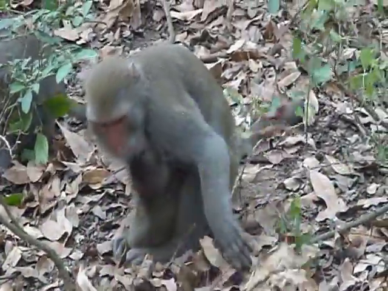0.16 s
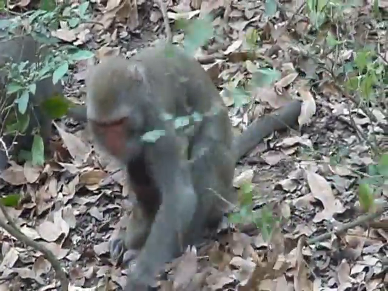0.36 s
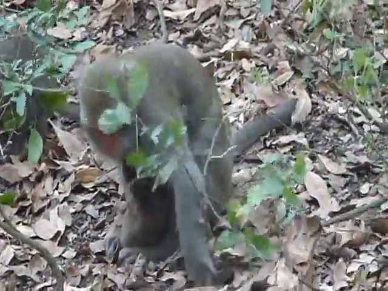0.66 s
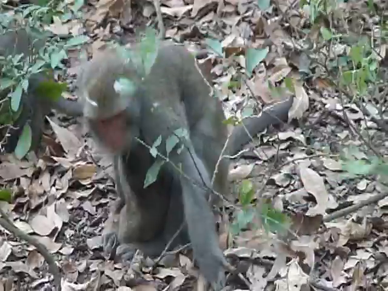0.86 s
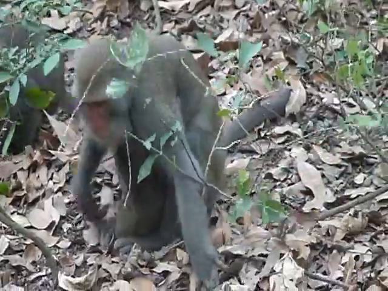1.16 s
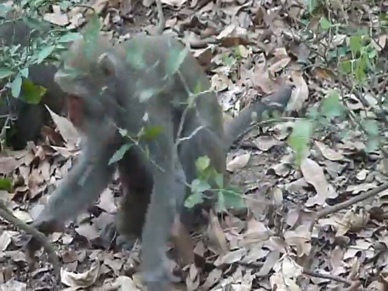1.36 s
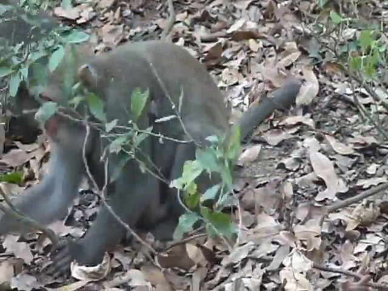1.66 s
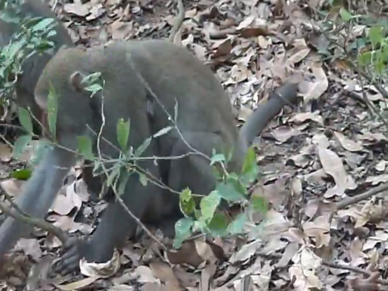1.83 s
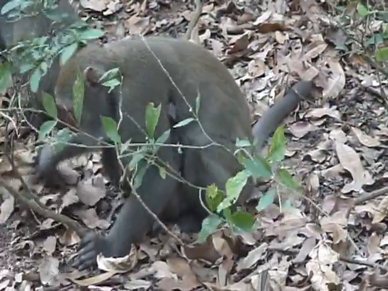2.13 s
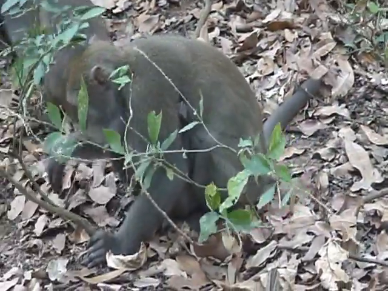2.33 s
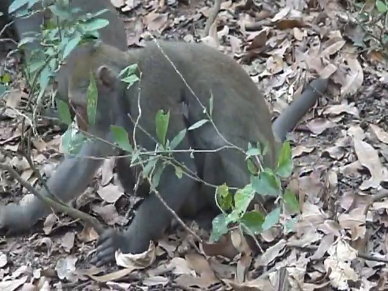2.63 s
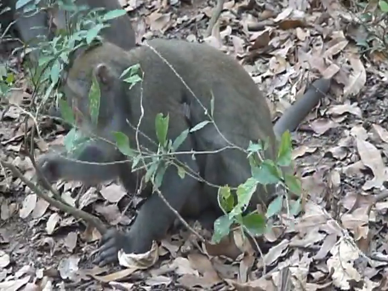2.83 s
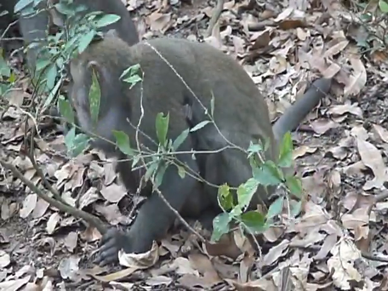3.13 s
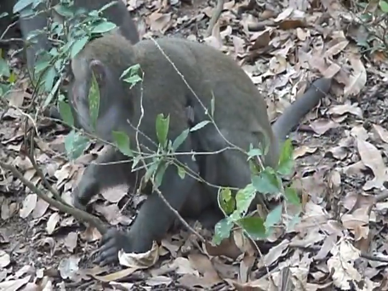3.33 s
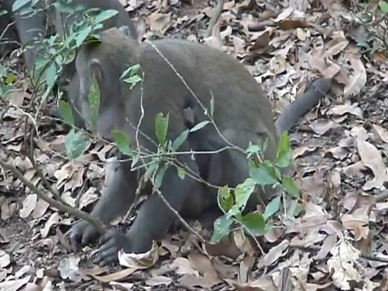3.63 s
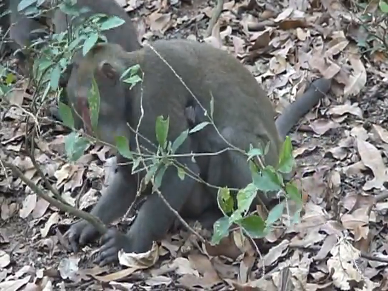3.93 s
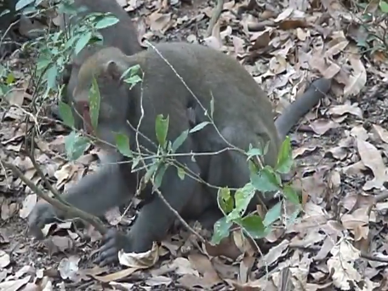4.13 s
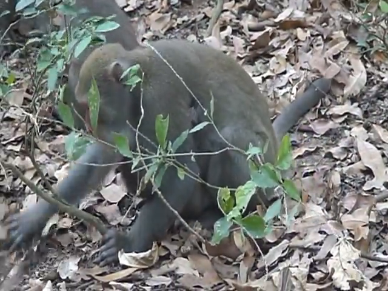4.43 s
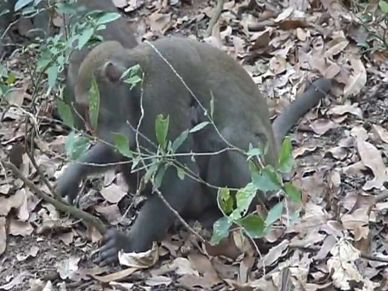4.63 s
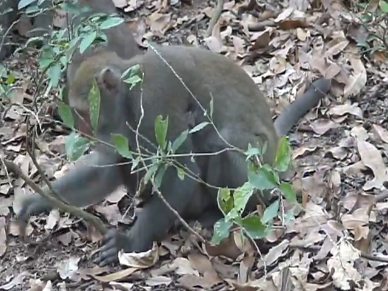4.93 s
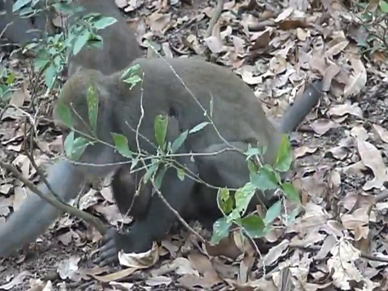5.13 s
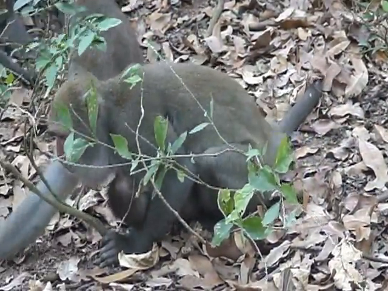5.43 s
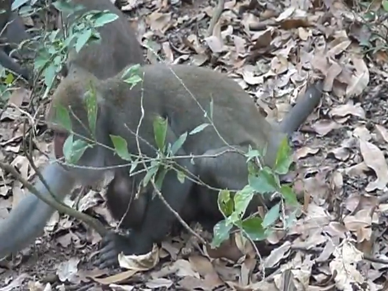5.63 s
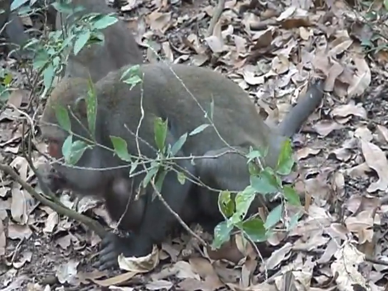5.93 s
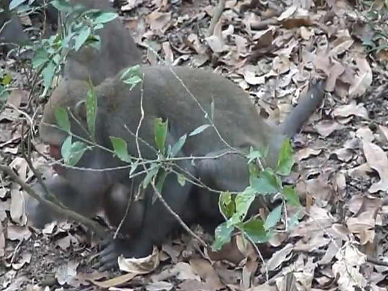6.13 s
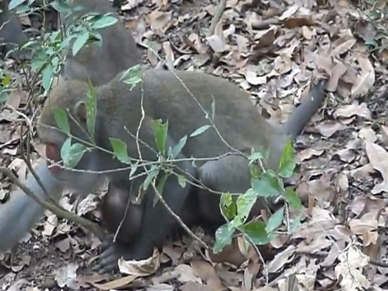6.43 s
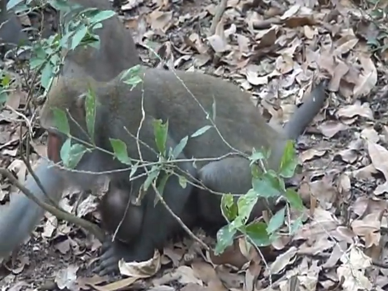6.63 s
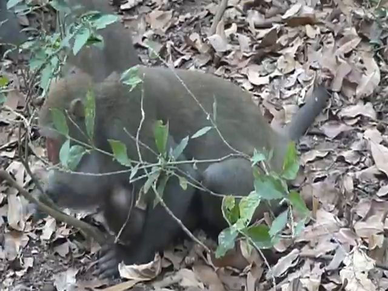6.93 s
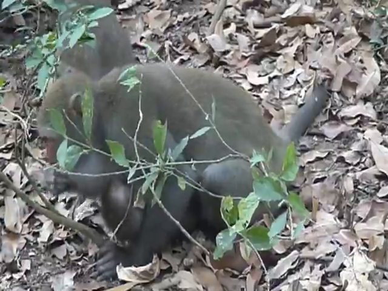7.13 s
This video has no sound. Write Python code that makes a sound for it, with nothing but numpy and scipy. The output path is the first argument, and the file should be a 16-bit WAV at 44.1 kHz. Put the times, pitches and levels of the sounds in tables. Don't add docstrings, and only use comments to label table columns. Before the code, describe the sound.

Dry leaves crackle under foraging hands as piercing monkey shrieks erupt twice, with low grunts between them, in an echoing forest over faint motor hum.

```python
import sys
import numpy as np
from scipy import signal
from scipy.fft import next_fast_len
from scipy.io import wavfile

SR = 44100
rng = np.random.default_rng(int(sys.argv[2]) if len(sys.argv) > 2 else 0)


def generate_wav(signal):
    frames = np.transpose(np.atleast_2d(signal))
    scaled = np.clip(frames, -1, 1) * 32767
    pcm = np.round(scaled).astype(np.int16)
    wavfile.write(sys.argv[1], SR, pcm)


def linear_from_db(decibels):
    return 10 ** (np.asarray(decibels, float) / 20)


N = 320607

# time in seconds, pitch in Hz, level in dB, roughness 0-1.
SCREECHES = [
    [(2.69, 1950, -35, .8), (2.72, 1991, -27.5, 0.9), (2.738, 2038, -22, 1.14), (2.77, 2323, -23.5, 0.85),
     (2.808, 2450, -32.5, 0.5)],
    [(2.724, 1446, -30, 0.7), (2.742, 1540, -28.5, 0.74), (2.76, 1750, -40, 1)],
    [(2.775, 4450, -26, 0.7), (2.795, 4430, -26, .7), (2.81, 4244, -22, 0.9), (2.84, 4500, -21.5, 1),
     (2.87, 4410, -17.5, 0.9), (2.887, 4100, -15.5, 1.2), (2.905, 3720, -41, 1)],
    [(2.848, 3150, -24.5, 0.3), (2.888, 3260, -20, 0.9), (2.918, 3050, -23, 0.9)],
    [(2.88, 2800, -23, 1.1), (2.9, 2600, -23.5, 1), (2.92, 2296, -34, 1)],
    [(3.0, 1040, -34, 1.1), (3.03, 1250, -30, 0.6), (3.051, 1494, -21.5, 0.6)],
    [(3.2, 1456, -21.5, 0.73), (3.212, 1890, -18.5, 0.94), (3.225, 2377, -15, 1.1),
     (3.245, 2600, -13, 0.82), (3.28, 2770, -18.5, 1.03), (3.315, 2420, -28.5, 0.7)],
    [(3.425, 1950, -23.5, 0.64), (3.45, 2206, -19, 1), (3.48, 2460, -19, 1.2), (3.515, 2410, -28, 0.9)],
    [(3.626, 2350, -20, 0.5), (3.645, 2426, -21, 0.63), (3.67, 2400, -31, .6)],
    [(6.918, 850, -33.5, .85), (6.94, 1080, -27, .8), (6.958, 1406, -27, .8), (6.975, 1653, -30, .9)],
    [(6.952, 1892, -23.5, .3), (6.965, 2148, -24.5, 0.3), (6.985, 2394, -28, 0.3), (7.0, 3080, -31, 0.3),
     (7.016, 3420, -29, 0.3)],
]
SCREECH_BRIGHT_DB = [2, 1, -4, -4.5, 3, 10, -5, 13.5, 6, 11, 3]
# time in seconds, pitch in Hz, level in dB, roughness 0-1.
ARCHES = [
    [(2.449, 3697, -24.5, 1), (2.48, 3900, -22.5, 0.5), (2.51, 4170, -27, 0.4), (2.54, 4340, -31, 1),
     (2.57, 4490, -25.5, 0.9), (2.6, 4490, -32, 0.8), (2.64, 4360, -40, 1)],
    [(2.412, 5600, -33, .2), (2.42, 5800, -30.5, 0), (2.428, 5640, -37, .5), (2.44, 5700, -37, .6)],
    [(6.209, 3070, -30.5, 0), (6.245, 3930, -25, 0.15), (6.27, 4094, -24, 0.26), (6.3, 4950, -33.5, 0.15),
     (6.32, 4800, -35, 0.4), (6.332, 4480, -27.5, 0.1), (6.36, 4350, -25, 0.07), (6.374, 4430, -28, 0),
     (6.385, 4510, -17, 0)],
    [(6.53, 3640, -33, 0.2), (6.545, 3900, -32, 0.2), (6.565, 4520, -31, 0.3)],
    [(6.531, 1150, -31, 0.64), (6.542, 1900, -22.5, 0), (6.555, 2317, -18.5, 0.13), (6.572, 3050, -24, 0.2),
     (6.59, 3800, -25, 0), (6.61, 4476, -24, 0.03), (6.637, 4444, -25.5, 0), (6.652, 3900, -22, 0.04),
     (6.688, 3810, -20.5, 0)],
    [(6.975, 3710, -31, 0.72), (6.992, 4040, -29.5, 0.66), (7.04, 4125, -31, 0.97),
     (7.075, 4080, -31.5, 0.54), (7.088, 3760, -29, 0.16), (7.118, 3620, -28.5, 0.2),
     (7.13, 3250, -29, 0.3)],
]
ARCH_BRIGHT_DB = [7, 0, -2.5, -15, -0.5, 2]
# time in seconds, pitch in Hz, level in dB, roughness 0-1.
HOOKS = [
    [(6.388, 5080, -18, 0), (6.396, 3620, -28, 0.6), (6.406, 2700, -25.5, 0.16)],
    [(6.692, 3650, -22, 0.4), (6.722, 3296, -20.5, .3), (6.738, 2997, -23, 0.7), (6.752, 2545, -18.5, 0.2)],
    [(7.125, 4620, -27, 0.1), (7.137, 4290, -19.5, 0.07), (7.142, 4170, -33, 0.7), (7.1435, 2110, -46, .8),
     (7.147, 2040, -34, 0.9), (7.151, 1750, -39, 0.9)],
]
HOOK_BRIGHT_DB = [-11, -4, -10]
# attack in seconds, release in seconds, tilt in dB per harmonic.
GLIDE_KINDS = [
    (.016, 0.013, -1.7),
    (.005, 0.017, -1.5),
    (0.0036, 0.0063, 1),
]
# peak in seconds, rise in seconds, fall in seconds, pitch in Hz, level in dB.
SHRIEKS = [
    (2.565, .05, 0.036, 2662, -20.5),
]
# peak in seconds, rise in seconds, fall in seconds, pitch in Hz, level in dB.
CRIES = [
    (2.459, .012, 0.027, 2464, -31.5),
    (6.545, 0.015, 0.02, 1903, -31.5),
    (6.95, 0.0036, 0.0088, 1860, -22),
]
# peak in seconds, rise in seconds, fall in seconds, pitch in Hz, level in dB.
RASPS = [
    (3.15, .035, 0.037, 2494, -23),
    (7.02, .03, .025, 2400, -38),
    (6.725, 0.046, 0.035, 4575, -19.5),
    (6.7, .013, 0.047, 3900, -22.5),
    (6.962, .015, .02, 4200, -37),
]
# peak in seconds, rise in seconds, fall in seconds, pitch in Hz, level in dB.
PIPS = [
    (3.068, .015, 0.026, 2300, -12.5),
    (3.092, 0.013, 0.017, 2450, -15.5),
    (2.57, .03, .025, 2450, -37.5),
]
# roughness 0-1, extra overtones in dB, tilt in dB, glide as share of pitch per second.
VOICES = [
    (0.6, 36, -2.5, -0.28),
    (0.3, 9.5, -5, 0.21),
    (0.86, -3, -5, -0.62),
    (0.5, -6, 2, 0.41),
]
# pitch in Hz, second harmonic in dB, slope above it in dB.
MOUTH = [(1350, -8, -4), (1850, -3, -7), (2350, -9, -1.5), (3000, -4, -1.5), (3800, 7, -3), (4200, 0.1, 4),
         (4520, -10, 6), (5700, -7, 0)]
# start in seconds, length in seconds, pitch in Hz, level in dB, mouth opening 0-1.
GRUNTS = [(2.674, 0.087, 201, -44, 0), (2.864, 0.23, 230, -42.5, 0), (3.116, 0.095, 148.5, -29, 0.43),
          (3.292, 0.067, 164, -29, 0.34), (3.421, 0.074, 170, -27, 0.45), (3.5, 0.1, 178.5, -41, 0.1),
          (3.57, 0.06, 165.7, -26, 0.48), (3.718, 0.062, 146.9, -30.5, 0.44), (3.791, 0.061, 259.6, -44, 0),
          (4.157, 0.1, 217.7, -45, 0), (4.277, 0.1, 256.6, -44, 0.13), (4.584, 0.1, 192.4, -49.5, 0),
          (5.148, 0.12, 216.2, -32.5, 0.91), (5.474, 0.11, 320, -49.5, 0.67)]
# centre in Hz, width in Hz, level in dB.
THROAT_SHUT = [(230, 91, -11), (620, 375, 7), (980, 150, -25), (2600, 460, -15)]
# centre in Hz, width in Hz, level in dB.
THROAT_OPEN = [(207, 110, -6), (894, 380, -7), (1120, 100, -17), (1480, 480, -2), (2820, 850, -16),
               (4750, 710, -21)]
# time in seconds, level in dB.
STIR = [(0, -40.5), (.9, -46), (1.8, -47), (2.66, -47), (2.82, -31), (2.95, -24), (3.52, -26), (3.8, -33.5),
        (4.5, -39), (5.16, -45.5), (5.8, -48), (6.2, -47), (6.85, -43.5), (7.27, -44)]
# peak in seconds, rise in seconds, fall in seconds, level in dB.
STROKES = [(.2, 0.16, 0.42, -43), (.57, 0.093, 0.21, -34.5), (1.16, 0.028, 0.23, -42),
           (1.452, 0.023, 0.36, -40), (1.679, 0.044, 0.034, -43), (1.88, 0.027, 0.27, -34.5),
           (2.04, 0.59, 1, -40), (3.02, .07, 0.24, -41), (3.37, 0.08, 0.2, -23), (3.49, 0.061, 0.04, -25),
           (3.66, 0.091, 0.025, -28), (3.74, 0.052, 0.088, -28.5), (3.88, 0.039, 0.045, -30),
           (3.96, 0.038, 0.057, -32), (4.085, 0.045, 0.034, -32.5), (4.185, 0.028, 0.03, -30),
           (4.28, 0.027, 0.044, -36), (4.36, 0.041, .1, -37.5), (4.58, 0.22, 0.41, -36),
           (4.968, 0.1, 0.12, -35), (5.24, 0.055, 0.097, -37.5), (5.5, 0.33, 0.31, -43),
           (5.9, 0.095, 0.51, -46.5)]
# frequency in Hz, level in dB per Hz.
DULL = [(180, -34), (300, 2.5), (385, -18), (473, -7.5), (669, -6), (887, -4), (4000, -3), (5200, -34),
        (8800, -120)]
# frequency in Hz, level in dB per Hz.
CRISP = [(1180, -33), (2000, -3), (2300, -7.5), (3010, -7.5), (4450, -4), (6200, -6.5), (8780, -7),
         (11000, -10.5), (12400, -6), (14400, -6.5), (16000, -15)]
# frequency in Hz, correlation 0-1.
LIKENESS = [(50, 0.99), (300, 0.64), (2000, 0.68), (8000, 0.54), (10800, 0.24), (11500, 0.24)]
# start in seconds, peak in dB, centre in Hz.
SNAPS = [(0.19, -35, 3410), (0.419, -30.5, 1860), (0.4794, -51, 4260), (1.0083, -50, 5540),
         (1.1694, -48, 4870), (1.321, -37, 1590), (1.6344, -31.5, 5540), (1.724, -34, 12100),
         (1.9633, -24.5, 4700), (2.0996, -24, 2320), (2.1306, -27, 6450), (2.161, -21.5, 5860),
         (3.7276, -20, 2550), (3.8543, -20, 1820), (4.439, -26, 2110), (4.69, -17, 8800)]
# start in seconds, peak in dB, centre in Hz, decay in seconds.
THUDS = [
    (0.39, -38, 330, 1),
    (1.9, -29, 660, 0.068),
    (6.921, -41, 150, 0.19),
    (7.125, -35, 96, 0.2),
    (4.7, -18, 18000, 0.21),
]
# frequency in Hz, level in dB.
HUM = [(71.8, -53.5), (78.6, -57.5), (143.8, -65)]
# frequency in Hz, level in dB per Hz.
RUMBLE = [(12, -45), (20, -8), (48, -10.5), (75, -5), (95, -4.5), (119, -8), (195, -10), (293, -10.5),
          (1000, -19), (1300, -48), (2200, -120)]

CUTOFF_HZ = 16000
SILENT_DB = -22
SWELL_DB, EDGE_DB, EDGE_POWER = 7.5, 24, 9.7
BREATH_DB, BREATH_LOW_SHARE, BREATH_TOP_HZ = -9.5, 0.9, 9600
OLDER_FROM_S, OLDER_UNTIL_S = 2.97, 3.7
OLDER_TOP_HZ, OLDER_BREATH_DB = 9600, 1
GRUNT_ROUGHNESS = 0.45
STROKE_FADE_DB = 11.5
STIR_DULL_DB, STROKE_DULL_DB = -5.5, -7.5
HEAVY_DB_PER_S = 5.5
HEAVY_DB = -10.5
SNAP_T60_S, FOREST_T60_S = 0.019, 0.27
ECHO_DB, RUMBLE_DB = -3.5, -52
SCREAM_PAN_DB, LEAF_PAN_DB = 2.5, 1.34
LEFT_LEAD = 0.2


def rms_one(x):
    return x / np.sqrt(np.mean(x ** 2) + 1e-20)


def wobble(rate_hz, count=N):
    r = np.exp(-2 * np.pi * rate_hz / SR)
    settle = 4000
    drift = signal.lfilter([1], [1, -2 * r, r * r], rng.standard_normal(count + settle))
    return rms_one(drift[settle:])


def resonance(x, hz, width_hz):
    r = np.exp(-np.pi * width_hz / SR)
    poles = [1, -2 * r * np.cos(2 * np.pi * hz / SR), r * r]
    return signal.lfilter((1 - r * r) / 2 * np.array([1, 0, -1]), poles, x)


def butter(x, order, hz, kind="low"):
    return signal.sosfilt(signal.butter(order, hz, kind, fs=SR, output="sos"), x)


def pan(x, db):
    return x * linear_from_db(np.array([[db / 2], [-db / 2]]))


def glide(rows, bright_db, attack_s, release_s, tilt_db):
    first, last = np.array(rows[0]), np.array(rows[-1])
    opening = first + [-attack_s, 0, SILENT_DB, 0]
    closing = last + [release_s, 0, SILENT_DB, 0]
    s, *columns = np.transpose([opening, *rows, closing])
    at = np.arange(int(s[0] * SR), int(s[-1] * SR))
    pitch, level_db, rough = [np.interp(at / SR, s, column) for column in columns]
    return at, pitch, level_db, rough, bright_db, tilt_db


def note(peak_s, rise_s, fall_s, hz, level_db, rough, bright_db, tilt_db, glide_per_s):
    at = np.arange(int((peak_s - rise_s) * SR), int((peak_s + fall_s) * SR))
    since = at / SR - peak_s
    away = np.abs(since) / np.where(since < 0, rise_s, fall_s)
    pitch = hz * (1 + glide_per_s * since)
    level_db = level_db - SWELL_DB * away - EDGE_DB * away ** EDGE_POWER
    return at, pitch, level_db, rough, bright_db, tilt_db


def calls():
    result = []
    brightness = (SCREECH_BRIGHT_DB, ARCH_BRIGHT_DB, HOOK_BRIGHT_DB)
    for curves, bright, kind in zip((SCREECHES, ARCHES, HOOKS), brightness, GLIDE_KINDS):
        result += [glide(rows, bright_db, *kind) for rows, bright_db in zip(curves, bright)]
    for notes, voice in zip((SHRIEKS, CRIES, RASPS, PIPS), VOICES):
        result += [note(*row, *voice) for row in notes]
    return result


def overtones(phase, pitch, second_db, slope_db, strength):
    order = np.arange(1, 9)[:, None]
    gains = linear_from_db(second_db * (order > 1) + slope_db * np.maximum(order - 2, 0))
    gains = gains * (order * pitch < CUTOFF_HZ)
    total = (gains * strength * np.sin(order * phase)).sum(0)
    return np.sqrt(2) * total / np.sqrt((gains ** 2).sum(0))


def clear_tone(pitch, chaos, second_db, slope_db):
    count = len(pitch)
    slack = np.clip((2900 - pitch) / 500, 0, 1)
    flutter = 1 + 0.6 * slack * wobble(250, count)
    shake = 0.004 * wobble(100, count) + (0.02 * chaos ** 2 + 0.022 * slack) * wobble(400, count)
    phase = 2 * np.pi * np.cumsum(pitch * (1 + shake)) / SR
    above = np.arange(8)[:, None]
    low_pitch = np.clip((3700 - pitch) / 900, 0, 1)
    clear = linear_from_db(-7 * np.maximum(above - 2, 0)) * linear_from_db(-10 * low_pitch * (above > 0))
    return flutter * overtones(phase, pitch, second_db, slope_db, clear)


def rasping(pitch, second_db, slope_db):
    count = len(pitch)
    slowest_hz = min(400, 0.16 * pitch.mean())
    erratic = np.array([wobble(slowest_hz + 250 * k, count) for k in range(8)])
    smeared = 2 * np.pi * np.cumsum(pitch * (1 + 0.045 * wobble(700, count))) / SR
    rasp = overtones(smeared, pitch, second_db - 0.5, slope_db + 1.0, erratic)
    return rasp + 0.29 * resonance(rasp, 3200, 1900)


def screams():
    young, older = np.zeros((2, N))
    mouth_hz, second, slope = np.transpose(MOUTH)
    for at, pitch, level_db, rough, bright_db, tilt_db in calls():
        is_older = OLDER_FROM_S < at[0] / SR < OLDER_UNTIL_S
        out = older if is_older else young
        second_db = np.interp(pitch, mouth_hz, second) + bright_db
        slope_db = np.interp(pitch, mouth_hz, slope) + tilt_db
        chaos = np.clip(rough, 0.001, 0.999)
        tone_db = level_db + 10 * np.log10(1 - chaos) + 1.2 * wobble(150, len(at))
        rasp_db = level_db + 10 * np.log10(chaos) + 1.3 * wobble(40, len(at))
        out[at] += clear_tone(pitch, chaos, second_db, slope_db) * linear_from_db(tone_db)
        out[at] += rasping(pitch, second_db, slope_db) * linear_from_db(rasp_db)
        breath_band = [BREATH_LOW_SHARE * pitch.mean(), BREATH_TOP_HZ]
        air = butter(rng.standard_normal(len(at)), 2, breath_band, "band")
        out[at] += air * linear_from_db(level_db + BREATH_DB + OLDER_BREATH_DB * is_older)
    deep = older + 0.73 * resonance(older, 9350, 1100) + 0.2 * resonance(older, 6400, 2200)
    return butter(young + butter(deep, 6, OLDER_TOP_HZ), 5, [850, 14500], "band")


def throat(source, peaks):
    out = 0
    for k, (hz, width_hz, db) in enumerate(peaks):
        ring = resonance(resonance(source, hz, width_hz), hz, 1.08 * width_hz)
        out = out + linear_from_db(db) * ring * (-1) ** k
    return rms_one(out)


def grunts():
    out, rough = np.zeros(N), GRUNT_ROUGHNESS
    for s, length, pitch, level_db, mouth in GRUNTS:
        size, start = int(length * SR), int(s * SR)
        along = np.linspace(0, 1, size)
        falling = pitch * (1.05 - 0.14 * along)
        cycles = np.cumsum(falling * (1 + 0.15 * rough * wobble(80, size))) / SR
        pulses = np.diff(np.floor(cycles), prepend=0) * linear_from_db(9.0 * rough * rng.standard_normal(size))
        breath = rng.standard_normal(size) * (cycles % 1 < 0.55)
        source = (1 - rough) * rms_one(pulses) + rough * breath
        low = rms_one(resonance(source, pitch, 140))
        mouth = np.clip(mouth, 0, 1)
        voice = (1 - mouth) ** 2 * low + 2 * mouth * (1 - mouth) * throat(source, THROAT_SHUT)
        voice = voice + mouth ** 2.16 * throat(source, THROAT_OPEN)
        out[start:start + size] += linear_from_db(level_db) * rms_one(voice) * np.sin(np.pi * along) ** 0.52
    return butter(out, 4, 125, "high")


def raking():
    time = np.arange(0, N, 40) / SR
    stir = linear_from_db(2 * np.interp(time, *np.transpose(STIR)))
    peak_s, rise_s, fall_s, db = np.transpose(STROKES)[:, :, None]
    away = np.abs(time - peak_s) / np.where(time < peak_s, rise_s, fall_s)
    stroke = linear_from_db(2 * (db - STROKE_FADE_DB * away))
    crisp = stir + stroke.sum(0)
    heavy = linear_from_db(2 * (STROKE_DULL_DB + HEAVY_DB_PER_S * fall_s))
    dull = stir * linear_from_db(2 * STIR_DULL_DB) + (stroke * heavy).sum(0)
    return [np.interp(np.arange(N) / SR, time, np.sqrt(power)) for power in (crisp, dull)]


def at_hz(points, hz):
    points_hz, values = np.transpose(points)
    return np.interp(np.log(hz), np.log(points_hz), values)


def banded(white, spectrum, low_hz, high_hz, patchy_db):
    out, together = 0, wobble(16)
    edges = np.geomspace(low_hz, high_hz, int(3 * np.log2(high_hz / low_hz)) + 1)
    for k, (low, high) in enumerate(zip(edges, edges[1:])):
        mid, side = butter(white[k % 2], 2, [low, high], "band")
        hz = np.sqrt(low * high)
        alike = np.clip(at_hz(LIKENESS, hz), -1, 1)
        gain = linear_from_db(at_hz(spectrum, hz) + patchy_db * (together + 1.53 * wobble(9.5)))
        out = out + gain * (np.sqrt(1 + alike) * mid + np.sqrt(1 - alike) * side * [[1], [-1]])
    return rms_one(out)


def leaves():
    crisp, dull = raking()
    crack_size = linear_from_db(2.6 * np.minimum(rng.exponential(1, N), 3.6))
    cracks = (rng.random(N) < 1500 / SR) * crack_size
    white = rng.standard_normal((2, 2, N)) * (1 + 0.34 * rms_one(cracks))
    hiss = banded(white[::-1], CRISP, 2209, 18350, patchy_db=0.5)
    hiss = hiss - np.clip(crisp / linear_from_db(HEAVY_DB), 0, 0.6) * resonance(hiss, 14600, 6000)
    return dull * banded(white, DULL, 281.0, 4168, patchy_db=1.5) + crisp * hiss


def snaps():
    size = 9000
    out, after = np.zeros(N + size), np.arange(size) / SR
    events = [(*snap, SNAP_T60_S) for snap in SNAPS] + THUDS
    for s, peak_db, hz, t60 in events:
        start = int(s * SR)
        burst = resonance(rng.standard_normal(size) * linear_from_db(-60 * after / t60), hz, 1.1 * hz)
        out[start:start + size] += linear_from_db(peak_db + 3.0) * burst / np.abs(burst).max()
    return out[:N]


def forest(x):
    after = np.arange(int(0.6 * SR)) / SR
    sparse = rng.random((3, len(after))) < 0.08
    shared, left, right = rng.standard_normal((3, len(after))) * sparse
    decay = linear_from_db(-60 * after / FOREST_T60_S) * (after > 0.004)
    tail = np.array([1.1 * shared + left, 1.3 * shared + right]) * decay
    tail = tail / np.sqrt((tail ** 2).sum(1, keepdims=True))
    return signal.fftconvolve(x[None], tail, axes=1)[:, :N]


def motor():
    time, lines = np.arange(N) / SR, 0
    for hz, db in HUM:
        phase = 2 * np.pi * hz * time + 1.35 * wobble(0.76)
        lines = lines + np.sqrt(2) * linear_from_db(db + 2.2 * wobble(3.7)) * np.sin(phase)
    rumble = banded(rng.standard_normal((2, 2, N)), RUMBLE, 20, 1019, patchy_db=1.5)
    return pan(lines, 2.2) + linear_from_db(RUMBLE_DB) * rumble


def scene():
    young, adult, twigs = screams(), grunts(), snaps()
    near = pan(young, SCREAM_PAN_DB) + pan(adult, 0.3) + pan(twigs, 3.0)
    echo = linear_from_db(ECHO_DB) * forest(young + 0.3 * adult + 0.6 * twigs)
    ground = near + pan(echo, SCREAM_PAN_DB) + pan(leaves(), LEAF_PAN_DB)
    return ground - 0.84 * resonance(ground, 351, 103) + motor()


def band_limit(x):
    return signal.sosfilt(signal.butter(12, 16970, fs=SR, output="sos"), x)


def record(dry):
    dry = np.tanh(dry / 0.95) * 0.95
    mid, side = (dry[0] + dry[1]) / 2, (dry[0] - dry[1]) / 2
    above_bass = signal.sosfiltfilt(signal.butter(2, 190, "high", fs=SR, output="sos"), mid)
    quarter_turn = signal.hilbert(above_bass, next_fast_len(N))[:N].imag
    side = side - LEFT_LEAD * quarter_turn
    mono_top = signal.cheby2(10, 12, 11300, fs=SR, output="sos")
    side = 0.13 * side + 0.87 * signal.sosfiltfilt(mono_top, side)
    top_cut = signal.ellip(12, 0.5, 60, CUTOFF_HZ - 150, fs=SR, output="sos")
    mix = signal.sosfilt(top_cut, np.array([mid + side, mid - side]))
    return band_limit(mix)


dry = scene()
out = record(dry)
generate_wav(out)
```